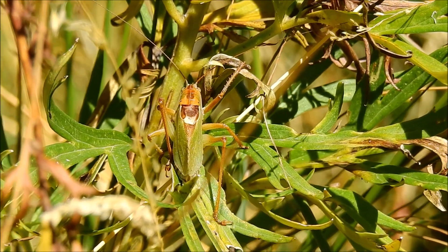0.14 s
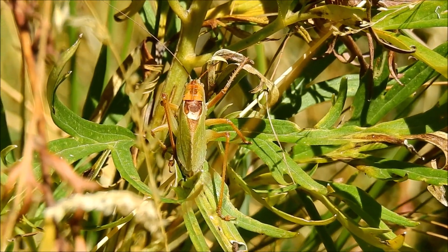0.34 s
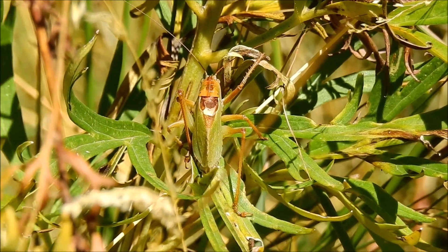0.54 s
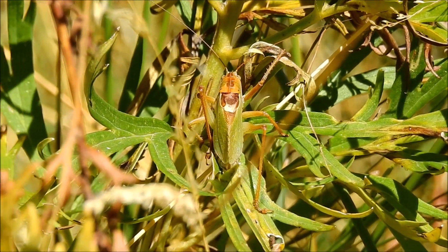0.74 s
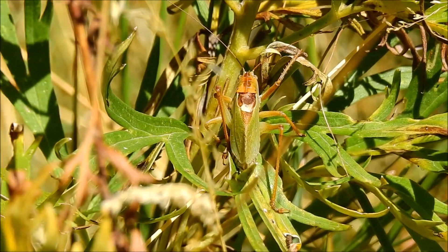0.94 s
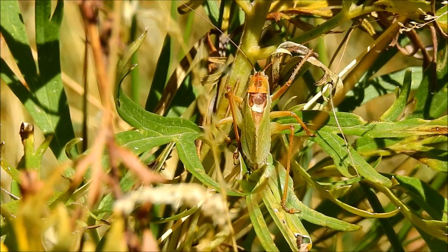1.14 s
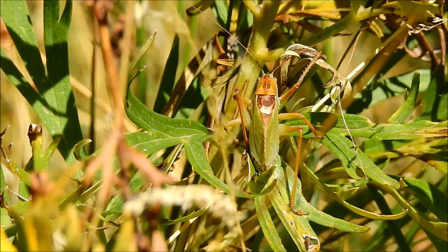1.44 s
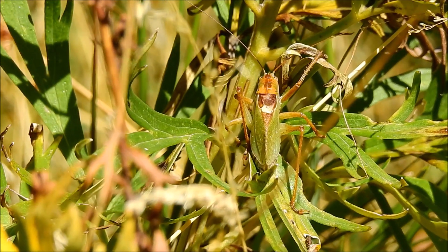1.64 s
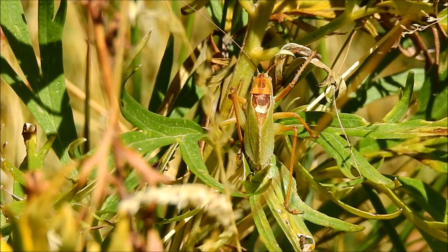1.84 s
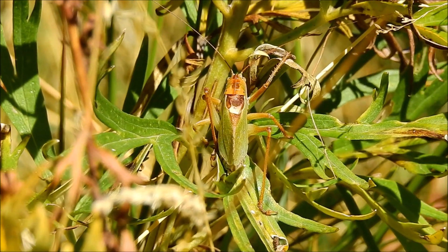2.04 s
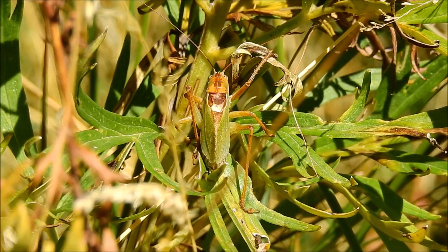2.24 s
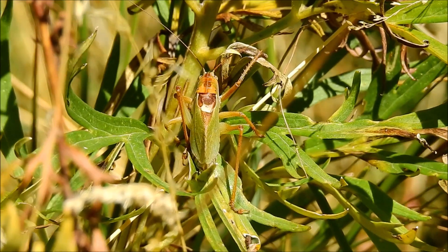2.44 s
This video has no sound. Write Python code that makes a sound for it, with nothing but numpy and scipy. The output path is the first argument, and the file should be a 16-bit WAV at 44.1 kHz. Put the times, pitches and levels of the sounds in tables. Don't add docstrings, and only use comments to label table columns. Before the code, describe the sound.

A nearby bush-cricket rasps about thirty sharp, high pulses a second, growing louder and slowing until it stops around 1.7 s. A fainter second singer buzzes until 2.1 s, over a soft insect shimmer. Thin bird whistles come before 0.7 s. Low wind puffs thump left and right separately. After a faint stem knock at 2.1 s, two distant singers overlap and dry leaves brush softly towards the end.

```python
import sys
import numpy as np
from scipy import signal
from scipy.io import wavfile
from scipy.ndimage import uniform_filter1d

SR = 44100
rng = np.random.default_rng(int(sys.argv[2]) if len(sys.argv) > 2 else 0)


def put_to_file(sound):
    columns = np.atleast_2d(sound).T
    safe = np.clip(columns, -1, 1)
    whole_steps = np.round(safe * 32767)
    wavfile.write(sys.argv[1], SR, whole_steps.astype(np.int16))


def invert_db(x):
    u = np.asarray(x, float) / 20
    return 10 ** u


N = 114660


def rms_one(x):
    return x / np.sqrt(np.mean(x ** 2) + 1e-20)


def in_time(rows):
    s, *columns = np.transpose(rows)
    return [np.interp(np.arange(N) / SR, s, c) for c in columns]


def at_hz(points, hz):
    points = np.array(points)
    return np.interp(np.log(hz), np.log(points[:, 0]), points[:, 1])


def drift(rate):
    step, settle = 40, 2000
    r = np.exp(-2 * np.pi * rate * step / SR)
    white = rng.standard_normal(N // step + settle + 2)
    slow = signal.lfilter([1], [1, -2 * r, r * r], white)[settle:]
    return np.interp(np.arange(N) / step, np.arange(len(slow)), rms_one(slow))


def resonate(x, hz, width_hz):
    r, w = np.exp(-np.pi * width_hz / SR), 2 * np.pi * hz / SR
    one = [(1 - r * r) / 2, 0, -(1 - r * r) / 2, 1, -2 * r * np.cos(w), r * r]
    return signal.sosfilt([one, one], x + 1e-18)


def spread(mid, side, alike):
    alike = np.clip(alike, -.99, .99)
    return np.sqrt(1 + alike) * mid + np.sqrt(1 - alike) * side * [[1], [-1]]


def grains(per_s, spread_db):
    hits = rng.random((2, N)) < per_s / SR
    level = invert_db(spread_db * np.minimum(rng.exponential(1, (2, N)), 4))
    return hits * level * rng.choice([-1, 1], (2, N))


def hiss(spectrum, likeness, patchy_db):
    points, out = np.array(spectrum), 0
    edges = 200 * 2 ** (np.arange(20) / 3)
    white, together = rng.standard_normal((2, 2, N)), drift(2.5)
    for k, (low, high) in enumerate(zip(edges, edges[1:])):
        hz, flicker = np.sqrt(low * high), drift(25.4)
        if points[0, 0] <= hz <= points[-1, 0]:
            sos = signal.butter(2, [low, high], "band", fs=SR, output="sos")
            band = signal.sosfilt(sos, white[k % 2])
            level = invert_db(at_hz(spectrum, hz) + patchy_db * (.5 * together + flicker))
            out = out + level * spread(*band, at_hz(likeness, hz))
    return rms_one(out)


def stridulate(rows, count, wing, stroke_s, opening_db, opening_at, lead_s, brighten_db, alike, pan_db,
               drag_db=(-60, -60)):
    s, db = np.transpose(rows)
    last = count[-1]
    strokes = np.arange(last + 1)
    chance = rng.standard_normal((len(strokes), len(wing) + 2))
    peak_s = np.interp(strokes, count, s) + .0005 * chance[:, 0]
    period = np.ptp(s) / last
    teeth = grains(per_s=12000, spread_db=1.2) * invert_db(.8 * drift(250))
    unsteady = drift(60)

    half = int(stroke_s * SR)
    phase = np.linspace(-1, 1, 2 * half + 1)
    rise, fall = 9 * np.abs(phase) ** 2.7, 24 * np.abs(phase) ** 3
    shape = np.exp(-np.where(phase < 0, rise, fall))

    out = 0
    for k, (hz, width_hz, level_db) in enumerate(wing):
        octave = np.log2(hz / 7200)
        uneven_db = .8 * (chance[:, 1] + chance[:, k + 2])
        bright_db = brighten_db * np.clip(octave, -.1, .05) * (strokes / last - .5)
        force = invert_db(np.interp(peak_s, s, db) + uneven_db + bright_db)
        at = peak_s - lead_s * np.clip(octave, -.3, .35)
        beats = np.zeros(N + SR)
        beats[(at * SR).astype(int)] = force
        beats[((at + opening_at * period) * SR).astype(int)] = force * invert_db(opening_db)
        effort = np.abs(signal.fftconvolve(beats, shape)[half:half + N])
        drag = force * invert_db(np.linspace(*drag_db, len(force))) * (strokes < last) * (hz > 7400)
        effort = effort + np.interp(np.arange(N) / SR, at, drag, left=0, right=0) * invert_db(3 * unsteady)
        out = out + invert_db(level_db) * resonate(effort * teeth, hz, width_hz) / np.sqrt(width_hz / 800)
    return 3.0 * spread(*out, alike) * invert_db([[pan_db / 2], [-pan_db / 2]]) / np.std(teeth)


# [t/s, level/dB]
NEAR_STROKES = [
    (.022, -48),
    (.263, -46.5),
    (.506, -45.5),
    (.747, -45),
    (.988, -44),
    (1.231, -42),
    (1.4075, -39.5),
    (1.5495, -40),
    (1.7345, -39.5),
]
NEAR_NUMBERS = [0, 7, 14, 21, 28, 35, 40, 44, 49]
# [f/Hz, width/Hz, level/dB]
NEAR_MODES = [(6900, 840, -27.5), (7200, 940, -6), (7540, 880, -1), (8540, 765, -1.5), (9100, 780, -7),
              (9870, 1540, -18.5), (11100, 400, -31), (13100, 7100, -33)]


def near_singer():
    return stridulate(NEAR_STROKES, NEAR_NUMBERS, NEAR_MODES, stroke_s=.0155, opening_db=-20, opening_at=.4,
                      lead_s=.008, brighten_db=8, alike=.45, pan_db=-1, drag_db=(-38, -17))


# [t/s, level/dB]
SECOND_STROKES = [
    (.150, -61),
    (.211, -60),
    (.516, -54.5),
    (.821, -54.5),
    (1.005, -54.5),
    (1.423, -62),
    (1.773, -51),
    (2.065, -53.5),
]
SECOND_NUMBERS = [0, 2, 12, 22, 28, 41, 52, 61]
# [f/Hz, width/Hz, level/dB]
SECOND_MODES = [(6170, 3300, -38), (6863, 910, 9), (7320, 360, 5), (9500, 1300, -11.5), (12400, 4200, -46)]


def second_singer():
    return stridulate(SECOND_STROKES, SECOND_NUMBERS, SECOND_MODES, stroke_s=.013, opening_db=-5,
                      opening_at=.5, lead_s=.002, brighten_db=110, alike=-.3, pan_db=-1)


# [t/s, level/dB]
THIRD_STROKES = [
    (2.095, -55),
    (2.157, -48),
    (2.187, -47),
    (2.280, -47),
    (2.373, -49),
    (2.403, -48),
    (2.469, -50),
]
FOURTH_STROKES = [
    (2.404, -58),
    (2.498, -45.5),
    (2.596, -45.5),
]
THIRD_NUMBERS = [0, 2, 3, 6, 9, 10, 12]
FOURTH_NUMBERS = [0, 4, 8]
# [f/Hz, width/Hz, level/dB]
FAR_MODES = [(6160, 780, -7.5), (7000, 680, 2), (7540, 720, 3), (8820, 1100, -5), (9900, 1700, -15.5),
             (11800, 3600, -23)]


def late_singers():
    shared = dict(lead_s=.002, brighten_db=0, alike=-.6, pan_db=-1)
    third = stridulate(THIRD_STROKES, THIRD_NUMBERS, FAR_MODES, stroke_s=.015, opening_db=-12,
                       opening_at=.45, **shared)
    fourth = stridulate(FOURTH_STROKES, FOURTH_NUMBERS, FAR_MODES, stroke_s=.012, opening_db=-16,
                        opening_at=.5, **shared)
    return third + fourth


# [t/s, length/s, level/dB]
PUFFS_ON_LEFT = [(0.054, 0.011, -38.5), (0.086, 0.017, -46), (0.207, 0.027, -36), (0.248, 0.014, -26.5),
                 (0.282, 0.014, -31.5), (0.323, 0.013, -41.5), (0.393, 0.016, -37), (0.426, 0.012, -30.5),
                 (0.487, 0.032, -27), (0.562, 0.036, -27), (0.708, 0.0087, -42), (0.779, 0.01, -27.5),
                 (0.854, 0.013, -59), (0.911, 0.065, -49), (0.97, 0.01, -44.5), (1.098, 0.013, -42.5),
                 (1.163, 0.0063, -28), (1.291, 0.023, -37.5), (1.386, 0.03, -45.5), (1.421, 0.012, -49),
                 (1.599, 0.025, -27), (1.641, 0.0073, -33.5), (1.821, 0.048, -31.5), (1.98, 0.013, -30),
                 (2.044, 0.024, -33.5), (2.195, 0.027, -39.5), (2.257, 0.02, -41.5), (2.299, 0.03, -35),
                 (0.594, 0.023, -46),
    (1.761, 0.015, -30.5),
    (1.855, 0.022, -54),
    (1.931, 0.046, -37.5),
]
PUFFS_ON_RIGHT = [(0.093, 0.021, -41), (0.154, 0.028, -40), (0.225, 0.02, -29.5), (0.312, 0.031, -50),
                  (0.403, 0.051, -48), (0.472, 0.024, -41), (0.508, 0.045, -31), (0.587, 0.028, -47),
                  (0.667, 0.012, -42), (0.891, 0.04, -49), (0.968, 0.012, -31), (1.001, 0.0095, -36.5),
                  (1.142, 0.012, -32.5), (1.296, 0.043, -41), (1.335, 0.013, -52.5), (1.4, 0.072, -45),
                  (1.465, 0.009, -23), (1.506, 0.0073, -36), (1.597, 0.041, -27), (1.762, 0.019, -25.5),
                  (1.81, 0.018, -21.5), (1.841, 0.021, -24), (1.899, 0.017, -35), (1.964, 0.032, -38.5),
                  (2.033, 0.028, -36.5), (2.107, 0.025, -43.5), (2.289, 0.02, -44), (2.341, 0.013, -36)]
# [t/s, level/dB, share of the deeper part/dB]
WIND_LULL = [
    (0, -55.5, 0),
    (1.8, -53.5, -14),
    (2.0, -60.5, 10),
    (2.35, -52.5, 3),
    (2.45, -60.5, 4),
]


def wind_on_port(puffs):
    t = np.arange(N) / SR
    lull_db, deep_db = in_time(WIND_LULL)
    power = invert_db(2 * lull_db + 2 * drift(23))
    for s, length, db in puffs:
        power = power + invert_db(2 * db) * np.exp(-4 * ((t - s) / (1.157 * length)) ** 2)
    white = rng.standard_normal((2, N + SR))
    noise = resonate(white[0], 97.7, 42.6)[SR:] + invert_db(deep_db) * resonate(white[1], 54.6, 44)[SR:]
    swing = uniform_filter1d(uniform_filter1d(noise ** 2, size=600), size=600)
    low_cut = signal.butter(2, 38, "high", fs=SR, output="sos")
    high_cut = signal.butter(6, 215, fs=SR, output="sos")
    return signal.sosfilt(np.vstack([low_cut, high_cut]), noise / np.sqrt(swing) * np.sqrt(power))


def wind():
    return np.array([wind_on_port(PUFFS_ON_LEFT), wind_on_port(PUFFS_ON_RIGHT)])


# [t/s, level/dB, port (0 left, 1 right)]
SHARP_PUFFS = [(.054, -58, 1), (.247, -41, 0), (.447, -56, 0), (.489, -44, 0), (.560, -40, 0),
               (1.161, -46, 0), (1.467, -50, 1), (1.572, -52, 0), (1.60, -47, 1), (1.635, -48, 0),
               (1.812, -41, 1), (1.814, -47, 0), (2.048, -53, 0)]


def thumps():
    out, t = np.zeros((2, N)), np.arange(N) / SR
    swing_hz, swing_s = 260, .0045
    for s, db, port in SHARP_PUFFS:
        pulse = np.exp(-((t - s) / swing_s) ** 2)
        out[int(port)] += invert_db(db) * pulse * np.sin(2 * np.pi * swing_hz * (t - s) + rng.uniform(0, 2 * np.pi))
    return out


# [t/s, level/dB]
KINKS_LEFT = [
    (.2465, -31.5),
    (.4841, -37.5),
    (.4886, -36),
    (.5083, -38.5),
    (.564, -42),
]
KINKS_RIGHT = [
    (1.809, -37),
]


def diaphragm_kinks():
    out = np.zeros((2, N))
    for port, kinks in enumerate([KINKS_LEFT, KINKS_RIGHT]):
        for s, db in kinks:
            out[port, int(s * SR)] = invert_db(db)
    push = signal.lfilter([1], [1, -np.exp(-2 * np.pi * 150 / SR)], out + 1e-18)
    return signal.sosfilt(signal.butter(1, 1500, fs=SR, output="sos"), push)


# [t/s, f/Hz, level/dB, time to fall 60 dB/s]
STEM_KNOCK = [
    (2.116, 570, -45, .06),
]


def stem_knock():
    s, hz, db, t60 = STEM_KNOCK[0]
    t = np.maximum(np.arange(N) / SR - s, 0)
    return invert_db(db - 60 * t / t60) * np.minimum(t / .008, 1) * np.sin(2 * np.pi * hz * t)


# [t/s, f/Hz, level/dB]
BIRD_WHISTLES = [
    [(0.0, 5330, -60), (0.028, 4908, -64), (0.068, 4850, -65), (0.144, 5014, -62), (0.174, 4990, -67),
     (.182, 4990, -90)],
    [(.325, 5900, -85), (.35, 5720, -73), (.41, 5378, -72), (.435, 5230, -76)],
    [(.692, 4400, -72), (.722, 4200, -78)],
    [(.696, 4500, -66), (.712, 6500, -61)],
]


def birds():
    out, t = 0, np.arange(N) / SR
    for rows in BIRD_WHISTLES:
        hz, db = in_time(rows)
        sounding = (t >= rows[0][0]) * (t < rows[-1][0])
        out = out + np.sqrt(2) * invert_db(db) * np.sin(2 * np.pi * np.cumsum(hz) / SR) * sounding
    return out


# [t/s, level/dB]
RUSTLE_LEVEL = [
    (2.33, -70.5),
    (2.46, -67),
    (2.6, -60),
]


def rustle():
    band = signal.butter(2, [130, 2600], "band", fs=SR, output="sos")
    brushes = signal.sosfilt(band, grains(per_s=900, spread_db=1.4))
    return invert_db(in_time(RUSTLE_LEVEL)[0]) * rms_one(spread(*brushes, .85))


# [f/Hz, level/dB]
CHORUS_SPECTRUM = [(4500, -37), (5800, -8), (7200, 2), (9500, -20), (12000, -26), (15500, -34)]


def chorus():
    return invert_db(-56.5) * hiss(CHORUS_SPECTRUM, [(4500, .1), (8000, -.55)], patchy_db=1.2)


# [f/Hz, level/dB]
AIR_SPECTRUM = [(140, 2), (240, -12.5), (313, -5), (647, 0), (844, -6), (2030, -14), (5000, -11.5),
                (6500, -12.5), (11000, -120)]
# [f/Hz, correlation]
AIR_CORRELATION = [(250, 0.58), (640, 0.93), (1400, 0.63), (5000, 0.34)]
# [t/s, level/dB]
BREEZE_LEVEL = [
    (0, -4.5),
    (2.3, 2),
]


def breeze():
    return invert_db(-66 + in_time(BREEZE_LEVEL)[0]) * hiss(AIR_SPECTRUM, AIR_CORRELATION, patchy_db=2.2)


def scene():
    singers = near_singer() + second_singer() + late_singers()
    background = chorus() + breeze() + birds()
    knocks = diaphragm_kinks() + stem_knock()
    return singers + background + knocks + thumps() + rustle() + wind()


def low_pass(x):
    return signal.sosfilt(signal.butter(12, 15760, fs=SR, output="sos"), x)


def record(dry):
    return low_pass(dry)


dry = scene()
out = record(dry)
put_to_file(out)
```